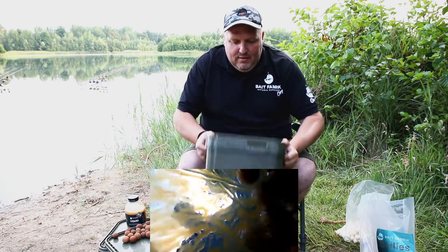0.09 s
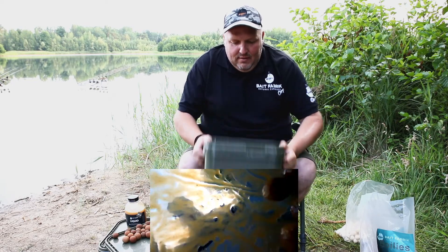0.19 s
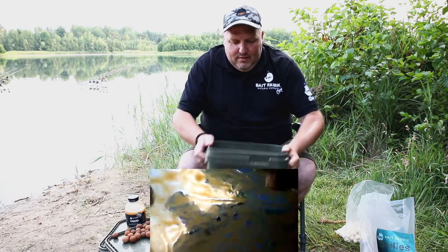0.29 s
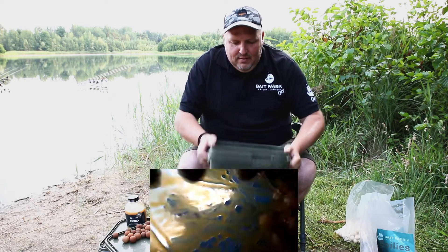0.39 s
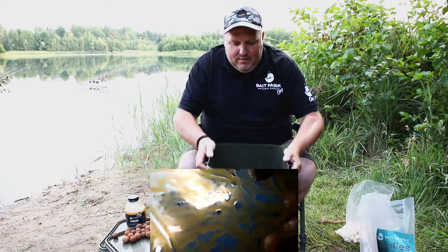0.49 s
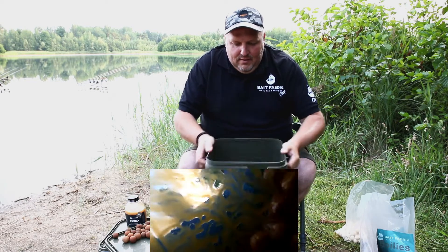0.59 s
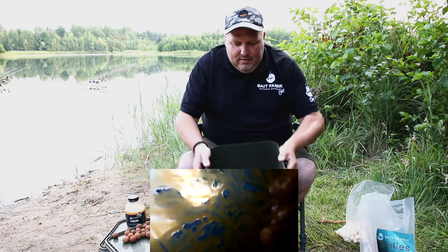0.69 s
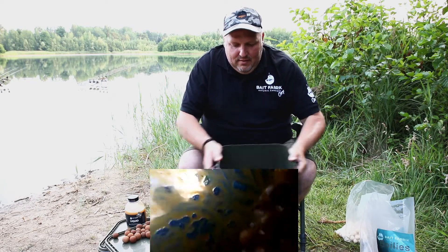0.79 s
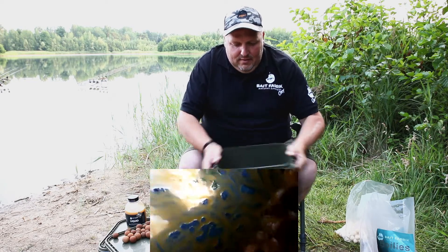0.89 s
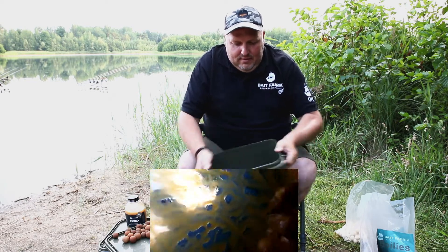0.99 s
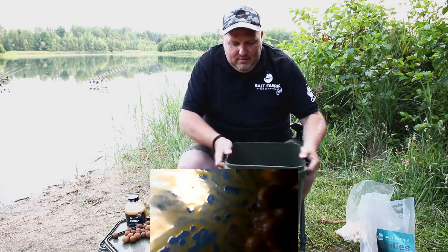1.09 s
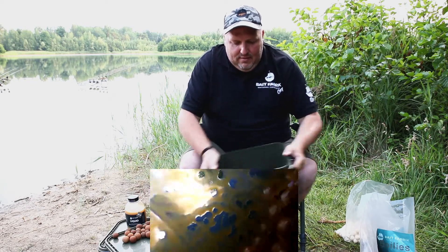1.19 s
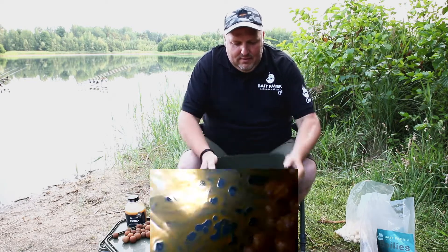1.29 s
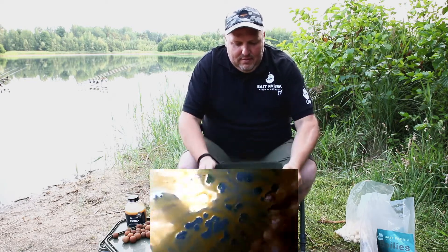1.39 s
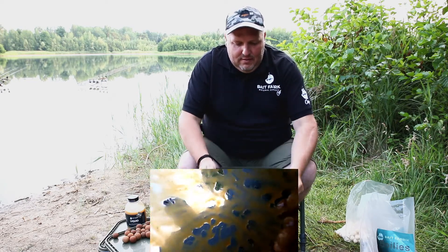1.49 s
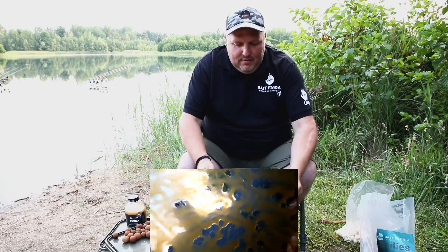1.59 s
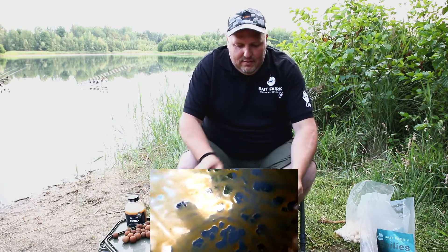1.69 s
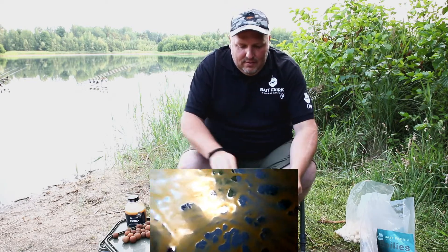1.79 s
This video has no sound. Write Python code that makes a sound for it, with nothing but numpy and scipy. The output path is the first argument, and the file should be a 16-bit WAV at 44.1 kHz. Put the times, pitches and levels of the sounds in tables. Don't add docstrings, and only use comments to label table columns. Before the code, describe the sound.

Hard round baits rattle in a plastic bucket, a few metres from a mono microphone. Faint settling leads to the loudest hollow clatter at 0.2-0.35 s and a strong return at 0.45-0.55. A weak stir comes near 0.7, a gentle swing near 1.0, a firmer tumble at 1.1-1.3. At 1.5 the bucket knocks down with quick low bounces, then slight brushes and clacks over quiet outdoor air and faint whine.

```python
import sys
import numpy as np
from scipy import signal
from scipy.fft import rfft, irfft
from scipy.io import wavfile
from scipy.ndimage import uniform_filter1d

SR = 44100
rng = np.random.default_rng(int(sys.argv[2]) if len(sys.argv) > 2 else 0)


def bounce(signal):
    frames = np.transpose(np.atleast_2d(signal))
    limited = np.clip(frames, -1, 1)
    pcm = np.round(limited * 32767).astype(np.int16)
    wavfile.write(sys.argv[1], SR, pcm)


def boost_factor(decibels):
    exponent = np.asarray(decibels, float) / 20
    return 10 ** exponent


N = 79380


def coloured(table):
    hz, db = np.array(table, float).T
    f = np.maximum(np.arange(N // 2 + 1) * SR / N, 1)
    shape = boost_factor(np.interp(np.log(f), np.log(hz), db))
    x = irfft(rfft(rng.standard_normal(N)) * shape, N)
    return x / x.std()


def filtered(x, hz, kind):
    return signal.sosfilt(signal.butter(2, hz, kind, fs=SR, output="sos"), x)


def decay(t60_s):
    return np.exp(-np.log(1000) / (t60_s * SR))


def ring(when, hz, db, t60, rise_cycles, size=5000):
    t = np.arange(size) / SR
    out = np.zeros(N + size)
    fade = np.exp(-np.log(1000) * t / t60[:, None])
    signs = np.sign(rng.standard_normal(hz.shape))
    for start_s, pitch, level, sign in zip(when, hz, db, signs):
        i = int(np.clip(start_s, 0, N / SR) * SR)
        cycles = pitch[:, None] * t
        modes = np.sin(2 * np.pi * cycles) * fade * (1 - np.exp(-cycles / rise_cycles))
        out[i:i + size] += (sign * boost_factor(level)) @ modes
    return out[:N]


COLOUR_DB, DETUNE = 3, 0.04


def strike(body, when, db, tilt_db, size=5000):
    hz, level, t60 = np.array(body, float).T
    chance = rng.standard_normal((len(when), 2, len(hz)))
    tilt = np.outer(np.clip(tilt_db, -12, 4), np.log2(hz / 500))
    gains = level + db[:, None] + COLOUR_DB * chance[:, 0] + tilt
    pitches = hz * (1 + DETUNE * chance[:, 1])
    return ring(when, pitches, gains, t60, rise_cycles=0.19, size=size)


def soften(x):
    contact_s = 0.00014
    push = np.hanning(int(contact_s * SR) + 3)
    return np.convolve(x, push / push.sum())[:N]


# pitch_hz, density_db [dB per Hz]
AIR = [(25, -18), (60, -1.5), (170, 12), (500, -12.5), (2000, -7), (4000, -19.5), (6500, -25), (10000, -20),
       (15700, -24)]
AIR_DB = -53.5
WHINE_HZ, WHINE_DB, WAVER_DB = 9994, -74.5, 3


def air():
    t = np.arange(N) / SR
    swell = uniform_filter1d(rng.standard_normal(N), size=6000)
    floor = boost_factor(AIR_DB + 0.6 * swell / swell.std()) * coloured(AIR)
    waver = uniform_filter1d(uniform_filter1d(rng.standard_normal(N), size=700), size=700)
    whine = boost_factor(WHINE_DB + WAVER_DB * waver / waver.std()) * np.sin(2 * np.pi * WHINE_HZ * t)
    return floor + whine


# middle_s, half_length_s, level_db, centre_hz
BRUSHES = [(0.196, 0.014, -50.5, 1954), (0.416, 0.017, -52.5, 2300), (0.917, 0.1, -51, 1500),
           (1.096, 0.16, -63, 7400), (1.451, 0.051, -63.5, 9700), (1.527, 0.012, -44, 1759),
           (1.65, 0.015, -50, 1759), (0.001, 0.0013, -48, 5556), (1.638, 0.0088, -59, 5500),
           (0.546, 0.0075, -61, 5200), (1.658, 0.0063, -46, 7500)]
BRUSH_OCTAVES = 0.5


def brushes():
    t, out = np.arange(N) / SR, 0
    for mid, half, db, hz in BRUSHES:
        roughness_db = 10 * uniform_filter1d(rng.standard_normal(N), size=100)
        grain = rng.standard_normal(N) * boost_factor(roughness_db)
        band = filtered(grain, [hz / 2 ** BRUSH_OCTAVES, hz * 2 ** BRUSH_OCTAVES], "band")
        out = out + boost_factor(db) * band / band.std() * np.exp(-((t - mid) / half) ** 2)
    return out


# pitch_hz, level_db, t60_s
SETDOWN = [(139, -6.5, 0.063), (221.4, -3.5, 0.063), (300.6, -8.5, 0.079), (388, -19, 0.05),
           (775, -5, 0.011)]
# start_s, peak_db
KNOCKS = [
    (1.503, -10.5),
    (1.521, -13),
    (1.535, -14.5),
    (1.558, -23),
]
GROUND_BASS_HZ = 111


def knocks():
    when, db = np.array(KNOCKS, float).T
    return filtered(strike(SETDOWN, when, db - 5.5, 0 * when), GROUND_BASS_HZ, "high")


# pitch_hz, level_db, t60_s
RIM = [(1000, 7, 0.013), (1500, -2, 0.056), (1932, -6, 0.042), (2613, -3, 0.025), (2710, -11, 0.06),
       (3170, -36, 0.019), (4070, -18, 0.0082)]
# pitch_hz, level_db
CRACK = [(600, -20), (1500, 9.5), (3500, -3), (5800, -12), (8000, -14.5), (10800, -13), (15600, -46)]
# start_s, peak_db,
# pitch_hz, crack_db
CLACKS = [(0.103, -27, 1500, -18.5), (0.13, -40.5, 1090, -2.5), (0.137, -39, 1220, -13),
          (0.313, -4.5, 1000, -31.5), (0.467, -8.5, 1000, -50), (0.577, -18, 1013, -51),
          (0.586, -22, 2350, -12), (0.63, -35, 1490, -10.5), (0.645, -30, 1060, -18),
          (0.708, -27.5, 1114, -15), (0.727, -19.5, 1020, -24.5), (0.839, -34.5, 2300, -7),
          (0.919, -21, 1200, -17), (0.977, -14, 795, -27), (0.999, -39.5, 1650, -1), (1.01, -27, 2090, -2),
          (1.013, -12, 2470, -18.5), (1.023, -35, 2530, -29), (1.061, -25, 1220, -20),
          (1.096, -19, 956, -21), (1.244, -20, 866, -27.5), (1.503, -18.5, 1623, -11.5),
          (1.52, -20.5, 1250, -18.5), (1.54, -23.5, 847, -23), (1.622, -41, 950, -3),
          (1.661, -19.5, 914, -17.5), (1.694, -27, 2370, -22),
          (0.236, -6.5, 956, -61), (0.276, 0, 1000, -53), (.645, -31.5, 2300, -40),
             (.92, -21.5, 1605, -40), (.921, -29, 3330, -40), (1.012, -11.5, 1730, -48),
             (1.144, -27, 2090, -18.5), (1.274, -31, 1560, -37), (1.304, -29, 1570, -31),
             (1.658, -25, 3200, -21), (1.696, -31, 1500, -30)]
# start_s, peak_db, pitch_hz, crack_db
MORE_CLACKS = [(.257, -27, 1700, -16), (0.275, -29.5, 2460, -10), (.298, -27, 2240, -15), (.34, -28.5, 2450, -29),
               (.402, -34.5, 2300, -15), (.47, -28, 2430, -17.5), (.492, -29, 1920, -9.5), (.504, -28, 2390, -26),
               (0.525, -23.5, 1475, -36), (0.538, -34, 2300, -9), (.553, -36, 2410, -22), (.564, -37, 2350, -12),
               (1.127, -25.5, 1440, -17), (1.193, -27.5, 1130, -23), (1.359, -34, 1660, -11),
               (1.402, -44, 1600, -12), (1.51, -30, 2680, -20), (1.652, -36.5, 1880, -5.5),
               (1.672, -37, 2930, -26), (1.719, -45.5, 1310, -10)]
RIM_DB, CRACK_DB, SNAP_DB = -16.5, 2.5, 10
RIM_PER_CRACK = 0.25
CLACK_T60_S, CRACK_T60_S = 0.03, 0.031
SNAP_T60_S = 0.0085


def clacks():
    when, db, hz, crack = np.array(CLACKS + MORE_CLACKS, float).T
    note = ring(when, hz[:, None], db[:, None] - 4.5, np.array([CLACK_T60_S]), rise_cycles=0.32, size=2500)
    rim_db = db + RIM_DB + RIM_PER_CRACK * (crack + 17)
    rim = strike(RIM, when, rim_db, 0 * when, size=2500)
    since = np.arange(N) / SR - when[:, None]
    after = np.clip(since, 0, 1)
    onset = np.clip(since / 0.0021, 0, 1)
    fade = boost_factor((db + crack + CRACK_DB)[:, None] - 60 * after / CRACK_T60_S) * onset
    snap = fade * boost_factor(SNAP_DB - 60 * after / SNAP_T60_S)
    noise = coloured(CRACK)
    bright = np.diff(noise, prepend=0)
    return note + rim + fade.sum(axis=0) * noise + snap.sum(axis=0) * bright


# pitch_hz, level_db, t60_s
BUCKET = [(131, -44, 0.032), (208, -12.5, 0.019), (266.6, -10, 0.13), (296, -0.5, 0.1),
          (430.6, -2.5, 0.068), (517.6, -2, 0.068), (579.6, 1.5, 0.05), (695.7, -4.5, 0.038),
          (919, -6.5, 0.021), (1020, -6, 0.024), (1312, -12, 0.023), (1680, -17, 0.025), (2300, -25, 0.029),
          (3200, -36, .02)]
# start_s, peak_db, tilt_db [dB per octave]
THUDS = [(0.02, -32.5, -13), (0.072, -30.5, -16.5), (0.088, -35, -15), (0.158, -31.5, -10),
         (0.181, -28.5, 7), (0.221, -9.5, -2), (0.247, -11, -6), (0.26, -16, 5), (0.286, -4.5, 6),
         (0.338, -14.5, -3), (0.376, -21.5, -7), (0.401, -31, 1), (0.44, -15.5, 1), (0.453, -18, 5),
         (0.476, -18, 6), (0.503, -8, 5.5), (0.508, -13.5, 1.5), (0.525, -23.5, 5), (0.541, -23, 7),
         (0.648, -28, -13.5), (0.677, -21.5, 1.5), (0.709, -16.5, -1), (0.728, -20.5, 0), (0.757, -26, 4),
         (0.936, -22.5, 1.5), (0.954, -19.5, -2.5), (0.982, -13.5, -5.5), (1.021, -22.5, 0),
           (1.049, -27.5, -5), (1.104, -21, -6), (1.1285, -6, 1.5), (1.141, -17.5, -2),
           (1.151, -10.5, -2.5), (1.165, -34, 0), (1.176, -31, 5), (1.193, -19.5, 2), (1.216, -22, 0.5),
           (1.225, -15.5, -0.5), (1.246, -11, 3.5), (1.256, -18, -0.5), (1.262, -19.5, -2.2),
           (1.277, -31, -4), (1.29, -13, 0), (1.303, -17, -3.5), (1.318, -14.5, -4), (1.375, -31.5, -2),
           (1.669, -33.5, -1)]
THUD_DB = -9


def thuds():
    when, db, tilt = np.array(THUDS, float).T
    return strike(BUCKET, when, db + THUD_DB, tilt)


# time_s, level_db
SHAKE = [
    [(0, -30), (.04, -40.5), (.062, -46), (.075, -43), (.105, -54), (.12, -50), (.2, -37.5)],
    [(.212, -27.5), (.24, -13.5), (.278, -12.5), (.29, -16), (.315, -15), (.345, -22), (.362, -31),
     (.42, -38.5)],
    [(.435, -30.5), (.45, -19), (.475, -16), (.49, -21.5), (.51, -16.5), (.535, -31.5), (.61, -45)],
    [(.64, -43), (.67, -42), (.685, -34.5), (.7, -38.5), (.74, -39.5), (.765, -41), (.78, -51), (.9, -47)],
    [(.93, -41.5), (.96, -31), (.972, -33.5), (.985, -28.5), (1.005, -33), (1.03, -37), (1.042, -51),
     (1.055, -33), (1.08, -36.5)],
    [(1.1, -30.5), (1.124, -35), (1.135, -21.5), (1.165, -21), (1.19, -39.5), (1.26, -30), (1.285, -33.5),
     (1.33, -36), (1.35, -64)],
    [(1.39, -49.5), (1.48, -69), (1.6, -55), (1.665, -42.5), (1.74, -62)],
]
TILT_DB, TILT_PER_DB, TILT_FROM_DB = 1, 0.1931, -31


def effort(t):
    time_s, level_db = np.concatenate([np.array(swing, float) for swing in SHAKE]).T
    db = np.interp(t, time_s, level_db)
    return db, TILT_DB + TILT_PER_DB * np.maximum(db - TILT_FROM_DB, 0)


SHOWER_PER_S, SHOWER_SCATTER_DB, SHOWER_DB = 2400, 2, -18
RUSTLE_DB, TICK_T60_S = -32.5, 0.0066


def shower(count=4):
    out, ticks = 0, 0
    swing_db, tilt_db = effort(np.arange(N) / SR)
    for zone in range(count):
        chance = rng.random((2, N))
        hits = chance[0] < SHOWER_PER_S / count / SR
        scatter_db = -SHOWER_SCATTER_DB * np.log(chance[1] + 0.0074)
        lands = hits * boost_factor(SHOWER_DB + swing_db + scatter_db)
        ticks = ticks + lands
        for hz, db, t60 in BUCKET:
            pitch = hz * (1 + DETUNE * rng.standard_normal())
            pole = decay(t60) * np.exp(2j * np.pi * pitch / SR)
            blows = boost_factor(db + tilt_db * np.log2(hz / 500)) * lands * rng.standard_normal(N)
            out = out + signal.lfilter([1], [1, -pole], blows).imag
    fading = signal.lfilter([1], [1, -decay(TICK_T60_S)], ticks)
    return soften(out) + boost_factor(RUSTLE_DB) * fading * coloured(CRACK)


# start_s, depth_db
SETTLES = [
    (.108, -3),
    (0.358, -7),
    (0.53, -3.5),
    (0.598, -16),
    (0.773, -10),
    (1.031, -9.5),
    (1.338, -16.5),
    (1.579, -18),
]
SMOTHER_S, RECOVER_S = 0.0033, 0.024


def smother():
    when, db = np.array(SETTLES, float).T
    since = np.clip(np.arange(N) / SR - when[:, None], 0, 2)
    dip = (1 - np.exp(-since / SMOTHER_S)) * np.exp(-(since / RECOVER_S) ** 2 / 2)
    return boost_factor(db @ dip)


SMALL_BODY_HZ = 134
ECHO_DB, ECHO_T60_S = -24, 0.41


def scene():
    bucket = shower() + soften(thuds()) + clacks()
    near = filtered(bucket, SMALL_BODY_HZ, "high")
    near = (near + knocks()) * smother() + brushes()
    tail = rng.standard_normal(8000) * boost_factor(-60 * np.arange(8000) / SR / ECHO_T60_S)
    echo = signal.fftconvolve(near, tail / np.sqrt(np.sum(tail ** 2)))[:N]
    return (near + boost_factor(ECHO_DB) * echo + air())[None]


def top_cut(x):
    return signal.sosfilt(signal.butter(12, 15700, fs=SR, output="sos"), x)


def record(dry):
    return top_cut(dry)


dry = scene()
out = record(dry)
bounce(out)
```